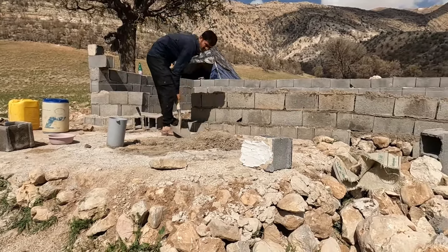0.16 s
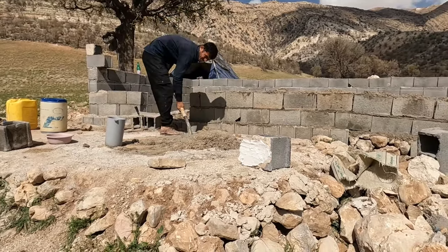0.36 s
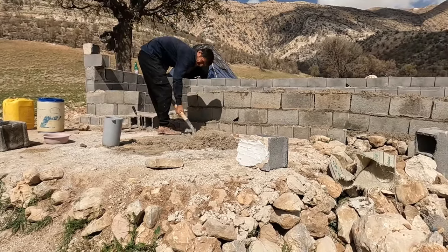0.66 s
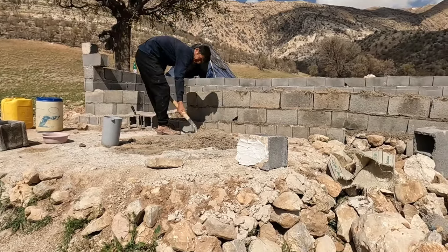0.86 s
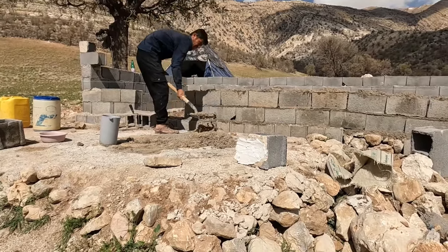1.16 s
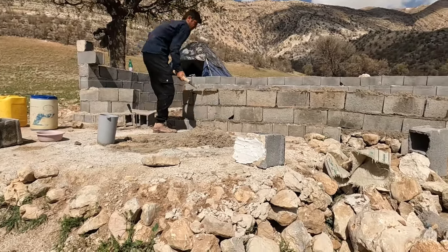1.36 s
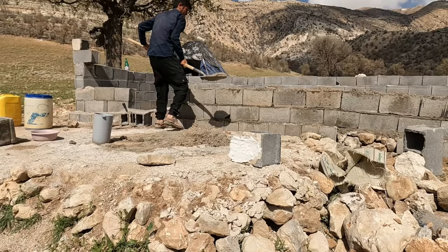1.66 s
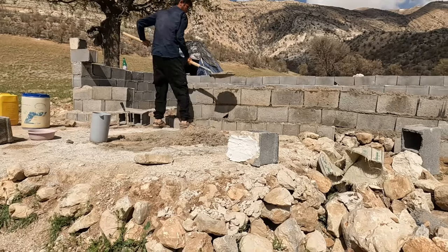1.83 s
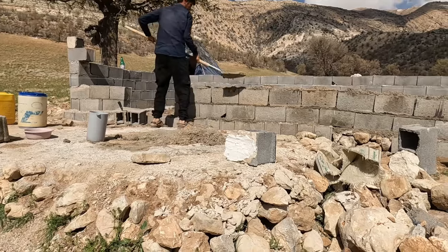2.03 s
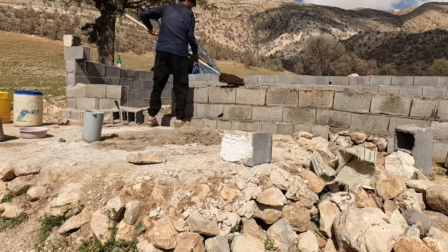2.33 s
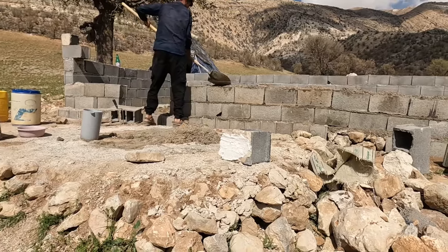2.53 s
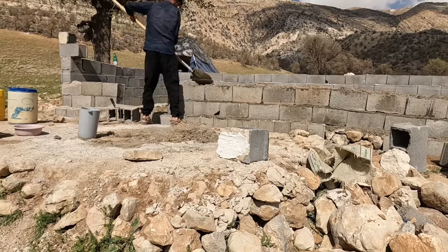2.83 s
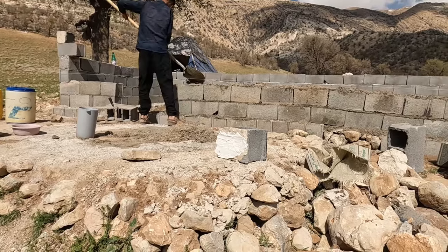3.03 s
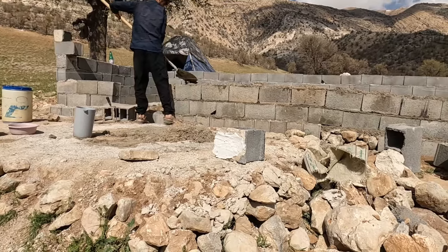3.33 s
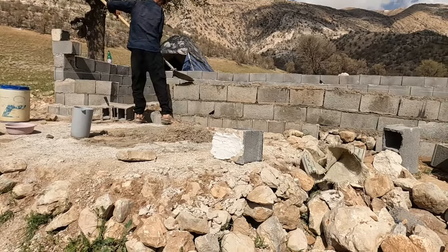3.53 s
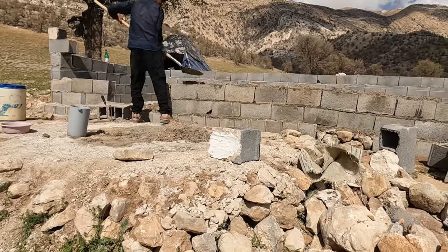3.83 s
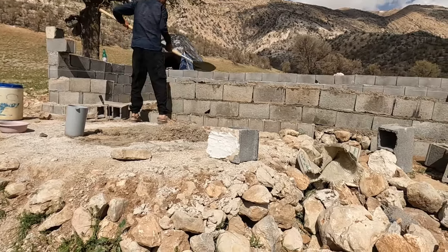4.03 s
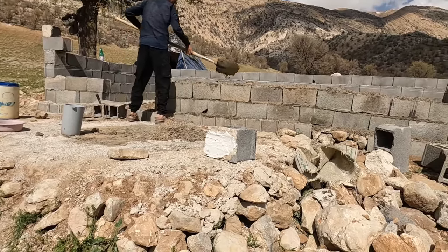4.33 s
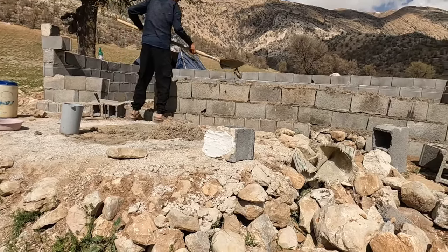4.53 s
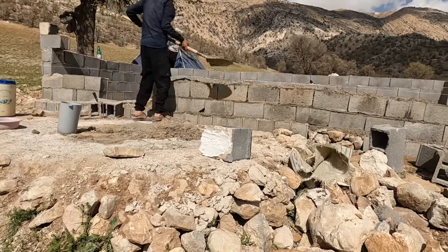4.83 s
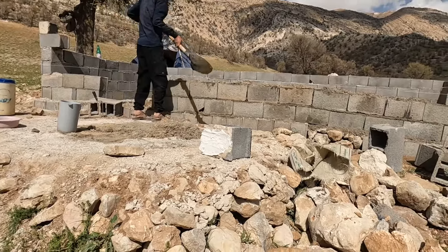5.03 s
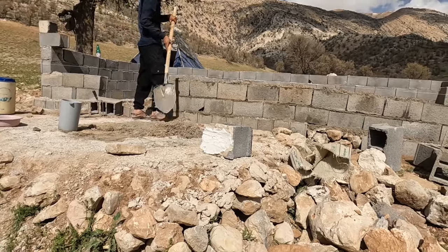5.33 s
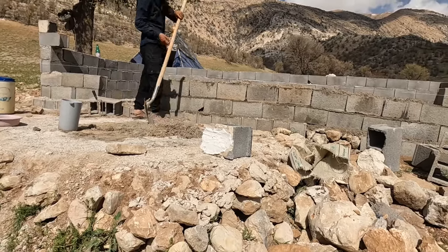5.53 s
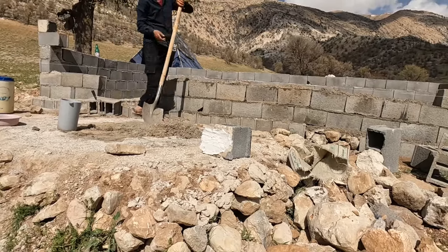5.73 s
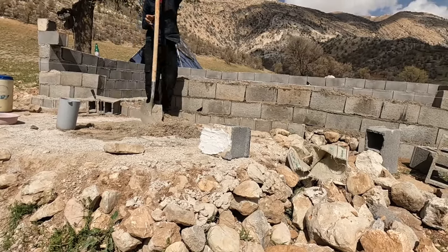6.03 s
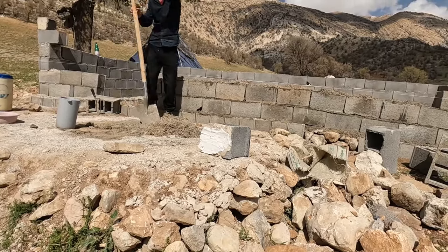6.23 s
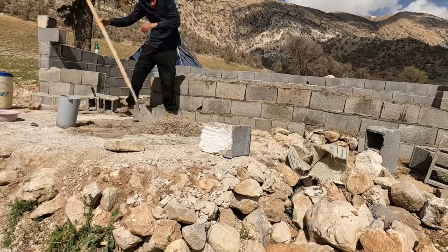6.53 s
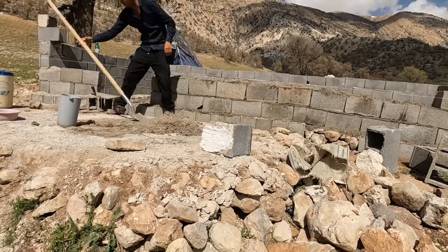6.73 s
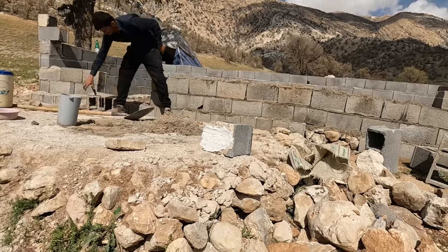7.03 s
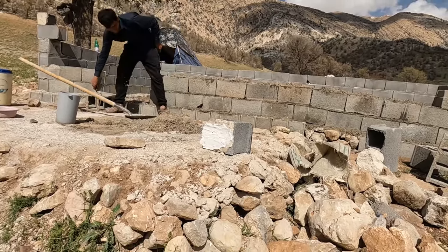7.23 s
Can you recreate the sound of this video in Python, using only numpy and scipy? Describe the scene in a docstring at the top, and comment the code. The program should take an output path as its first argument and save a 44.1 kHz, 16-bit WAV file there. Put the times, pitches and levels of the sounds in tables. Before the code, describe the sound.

Wind rumbles and pops on the microphone as a shovel scoops gritty mortar, tips it out, stabs the heap and is dropped.

```python
"""Some metres off, a steel shovel scrapes up wet mortar, sand hissing and grit ringing the blade,
while gusty wind buffets the microphone ports of a small camera. The load is tipped along a block wall
as the strongest gust hits, near 2.6 s; after it the stereo picture narrows to mono. A faint whistle
rises and thin tones sound far off. Among short slides and ticks of grit, the shovel is stabbed into
the heap at 5.5 s and dropped at 7.2 s with a low, rough thud."""
import sys
import numpy as np
from scipy import signal
from scipy.fft import rfft, irfft, next_fast_len
from scipy.io import wavfile
from scipy.ndimage import uniform_filter1d, map_coordinates

SR = 44100
rng = np.random.default_rng(int(sys.argv[2]) if len(sys.argv) > 2 else 0)


def transcribe(u):
    """Save the signal u as a 16-bit wav file named by the first command-line argument.

    u: samples, shape (n,) or (channels, n), limited to [-1, 1]; the rate is SR.
    q: integer samples, one column per channel.
    """
    v = np.clip(np.atleast_2d(u).T, -1, 1)
    q = np.round(v * 32767).astype(np.int16)
    wavfile.write(sys.argv[1], SR, q)


N = 325899
TIME = np.arange(N) / SR
FFT_SIZE = next_fast_len(N)


def undb(db):
    return 10 ** (np.asarray(db) / 20)


def unit_rms(x):
    return x / np.sqrt(np.mean(x ** 2))


def curves(table):
    """Automation lanes: each column joined by straight lines over the times in the first."""
    times, *columns = np.transpose(table)
    return [np.interp(TIME, times, column) for column in columns]


def band(x, lo_hz, hi_hz, order=2):
    return signal.sosfilt(signal.butter(order, [lo_hz, hi_hz], "bandpass", fs=SR, output="sos"), x)


def spectral_gain(x, gain):
    """Weigh a spectrum by a gain; a complex one also turns the phase."""
    return irfft(rfft(x, FFT_SIZE) * gain, FFT_SIZE)[..., :N]


def equalise(x, points):
    """An EQ curve drawn through (Hz, dB) points."""
    hz, db = np.transpose(points)
    bin_hz = np.maximum(np.arange(FFT_SIZE // 2 + 1) * SR / FFT_SIZE, 1)
    return spectral_gain(x, undb(np.interp(np.log(bin_hz), np.log(hz), db)))


def ring(x, hz, t60):
    """One damped mode; a unit click rings with unit size."""
    pole = np.exp(2j * np.pi * hz / SR - np.log(1000) / (t60 * SR))
    return signal.lfilter([1], [1, -pole], x).imag


def wander(rate_hz):
    """A random modulator: sample and hold, smoothed twice."""
    hold = int(SR / rate_hz)
    steps = np.repeat(rng.standard_normal(N // hold + 1), hold)
    return unit_rms(uniform_filter1d(uniform_filter1d(steps, hold), hold)[:N])


def grains(scatter_db):
    """Dense clicks, a few much larger than the rest."""
    return rng.standard_normal(N) * undb(scatter_db * np.minimum(rng.exponential(size=N), 6.0))


def swell(start, length, first_db, last_db, rise_db_s=609.5, fall_db_s=360.5):
    """Gain that climbs to the start, slides from first_db to last_db and dies away."""
    depth_db, end = 80, start + length
    times = [start - depth_db / rise_db_s, start, end, end + depth_db / fall_db_s]
    return undb(np.interp(TIME, times, [first_db - depth_db, first_db, last_db, last_db - depth_db]))


def place(out, start, sound, peak_db):
    """Lay a sound in at start seconds, scaled to its peak level."""
    i = int(start * SR)
    out[i:i + len(sound)] += (sound * undb(peak_db) / np.abs(sound).max())[:N - i]


# Colour of the ambience bed. Each row: frequency in Hz, relative level in dB.
RUSTLE_EQ = [(300, -13), (550, -21), (800, -12.5), (1300, -2.5), (2000, -8.5), (4000, -16.5), (5200, -4.5),
             (7000, -16), (8000, -33), (10000, -50.5)]
def distant_rustle(level_db=-72.5):
    """A faint bed of far-off rustle whose level flickers."""
    bed = equalise(rng.standard_normal(N), RUSTLE_EQ)
    return unit_rms(bed * undb(1.5 * wander(12))) * undb(level_db)


# Faint tones far off. Each row: start in seconds, length in seconds, pitch in Hz, peak in dB.
FAR_TONES = [(3.542, 0.16, 2350, -67), (3.873, 0.36, 2340, -74.5), (3.966, 0.07, 1320, -66.5),
             (4.05, 0.1, 1000, -66.5), (4.08, 0.087, 5100, -67.5), (4.08, 0.068, 4480, -68),
             (4.17, 0.1, 850, -62), (4.764, 0.065, 5140, -58.5), (5.03, 0.061, 1376, -66)]
def far_tones():
    """Thin, breathy tones: noise through a narrow resonance swells and fades."""
    out, t = np.zeros(N), TIME[:SR // 3]
    for start, length, hz, db in FAR_TONES:
        fade = np.sin(np.pi * np.minimum(t / length, 1)) ** 0.5
        place(out, start, ring(rng.standard_normal(len(t)), hz, t60=0.12) * fade, db)
    return out


# The whistle's glide. Each row: time in seconds, pitch in Hz, level in dB.
WHISTLE_GLIDE = [(3.27, 683, -76), (3.31, 699, -54), (3.42, 760, -57), (3.465, 815, -53),
                 (3.52, 903, -60.5), (3.7, 957, -74)]
def wind_whistle(gate_db=-74):
    """A faint, rough whistle, a narrow band of noise, rises as a gust dies."""
    hz, db = curves(WHISTLE_GLIDE)
    phase = 2 * np.pi * np.cumsum(hz * (1 + 0.032 * wander(30))) / SR
    breath = np.sin(phase) * wander(220) + np.cos(phase) * wander(220)
    return breath * undb(db) * (db > gate_db)


def pop(hz, edge):
    """A pressure dip with a small rebound and a sharper edge on top."""
    u = np.pi * hz * (TIME[:SR // 50] - 0.78 / hz)
    return (2 * u ** 2 - 1) * np.exp(-u ** 2) - edge * 3 * u * np.exp(-5 * u ** 2)


def flapping(pops_per_s=200):
    """A rough, low texture: small pops burst at random and come in clumps."""
    bursts = (rng.random(N) < pops_per_s / SR) * rng.standard_normal(N)
    flaps = unit_rms(signal.fftconvolve(bursts, pop(hz=228, edge=0.38))[:N])
    crackle = unit_rms(band(grains(2.1), 540, 880))
    body = unit_rms(band(rng.standard_normal(N), 170, 363, order=3))
    return unit_rms((flaps + 0.041 * crackle + 0.25 * body) * undb(3.17 * wander(70)))


def buffeting():
    """Bass noise whose level lurches."""
    return unit_rms(band(rng.standard_normal(N), 63.7, 181.8, order=3) * undb(3.33 * wander(25)))


# Sharp wind pops. Each row: start in seconds, peak in dB, pitch in Hz.
WIND_POPS = [(0.666, -30.5, 336), (0.684, -31.5, 352), (0.761, -23, 382), (0.779, -34.5, 397),
             (1.475, -35, 390), (1.538, -35.5, 430), (1.876, -44.5, 426), (2.2, -33, 407),
             (2.252, -34.5, 420), (2.312, -33.5, 330), (2.538, -37, 332), (2.585, -27, 335),
             (2.596, -12.5, 391), (2.606, -18, 347), (2.634, -19.5, 417), (2.68, -18, 487),
             (2.709, -25, 433), (2.727, -21, 385), (2.739, -22, 400), (2.768, -23, 434),
             (2.845, -26.5, 290), (2.862, -25, 440), (2.9, -24, 402), (2.94, -33, 346), (3.076, -36.5, 400),
             (3.457, -41, 394), (3.607, -32, 328), (3.781, -42, 320), (4.087, -49, 330)]
def wind_pops():
    """Single hard eddies burst on the ports, each trailing a ragged wake."""
    out, t = np.zeros(N), TIME[:SR // 30]
    for start, db, hz in WIND_POPS:
        wake = rng.standard_normal(len(t)) * t * np.exp(-t / 0.0047)
        place(out, start, pop(hz, edge=0.68), db)
        place(out, start, band(wake, 1.08 * hz, 2.0 * hz), db - 15)
    return out


def low_wind(rumble_gain, buffet_gain):
    """Large eddies on the ports: a slow, deep rumble under quicker buffeting."""
    rumble = unit_rms(band(rng.standard_normal(N), 26.1, 67.3) * undb(2.0 * wander(9.1)))
    return rumble_gain * rumble + buffet_gain * buffeting()


# The ride of the gusts. Each row: time in seconds, rumble in dB, buffeting in dB over the rumble.
GUSTS = [(0.0, -42, -16), (0.76, -32.5, -6.5), (1.07, -41, -30), (1.19, -37, -3.5), (1.25, -28, -20),
         (1.29, -35.5, -3), (1.42, -33.5, -4.5), (1.58, -28.5, -1.5), (1.77, -36.5, -15.5),
         (1.85, -43.5, 2.5), (1.91, -24.5, -13), (2.04, -48, -3.5), (2.2, -38, -21), (2.3, -32.5, -7),
         (2.34, -24, -24), (2.4, -35.5, -9), (2.51, -33, -14), (2.55, -28, 2), (2.88, -27, -6),
         (3.19, -46.5, 6), (3.38, -31, -3), (3.68, -47, 10), (3.77, -32, -16), (3.89, -53, 10.5),
         (4.14, -32, -19), (4.22, -43, -2), (4.55, -38.5, -13.5), (5.41, -41, -25), (5.47, -38, -17.5),
         (5.62, -31.5, -10), (5.75, -41, -2), (5.95, -39, 1.5), (6.18, -48, 2), (6.33, -40.5, 2),
         (6.48, -36.5, -3.5), (6.54, -51, 4.5), (7.14, -46, -28), (7.18, -53.5, 10), (7.29, -35.5, -13.5),
         (7.34, -35.5, -6), (7.39, -35, -5)]
# Low, rough bursts: wind flurries, then in the last row the thud of the dropped shovel.
# Each row: start in seconds, length in seconds, level in dB.
LOW_BURSTS = [(0.073, 0.014, -59), (0.228, 0.023, -60), (0.414, 0.059, -50), (0.669, 0.019, -42),
              (0.751, 0.015, -38.5), (1.399, 0.028, -39.5), (1.484, 0.039, -35.5), (1.587, 0.015, -37),
              (1.88, 0.026, -45.5), (2.199, 0.018, -34.5), (2.245, 0.015, -32), (2.302, 0.011, -35.5),
              (2.544, 0.046, -37), (2.599, 0.0087, -28), (2.631, 0.014, -32.5), (2.683, 0.013, -31.5),
              (2.722, 0.072, -29), (2.857, 0.02, -28), (2.903, 0.03, -40.5), (3.069, 0.03, -57),
              (3.294, 0.08, -41), (3.436, 0.21, -50.5), (3.78, 0.02, -40), (4.082, 0.011, -52.5),
              (5.793, 0.046, -48.5), (6.157, 0.026, -48.5), (6.316, 0.11, -58), (6.801, 0.013, -61.5),
              (7.194, 0.039, -41.5)]
def wind():
    """Wind on the ports, as mid and side. Fine eddies strike the right port first and harder."""
    rumble_db, buffet_db = curves(GUSTS)
    gust = undb(rumble_db + buffet_db)
    flurry = sum(swell(start, length, db, db) for start, length, db in LOW_BURSTS[:-1])
    buffet_gain = gust + undb(-2) * flurry  # a flurry brings buffeting along
    low_mid = low_wind(undb(rumble_db), buffet_gain)
    low_side = undb(-4.5) * low_wind(undb(rumble_db), buffet_gain)
    fine = (flurry + undb(-36) * gust) * flapping() + wind_pops()
    left = 0.52 * np.exp(-1.55j)  # left port against right: size and lag in radians
    fine_side = spectral_gain(fine, (left - 1) / (left + 1))
    return low_mid + fine + wind_whistle(), low_side + fine_side


# Modes of the bare blade. Each row: frequency in Hz, gain in dB, time to fall 60 dB in seconds.
BLADE_MODES = [(555, 6, 0.08), (616, 0.5, 0.14), (745, -2.5, 0.19), (840, 4, 0.18), (1102, 12, 0.18),
               (1566, 6.5, 0.05), (1954, 11, 0.07), (2340, 8, 0.048), (2980, 8, 0.07), (3186, 2, 0.07),
               (3900, -5, 0.027), (4830, -12, 0.035)]
MORTAR_DAMPING = 1.9  # a loaded blade falls silent this many times sooner
def blade(force, roam_db=0, damping=1):
    """The steel blade rung by a force; as the contact roams, each mode comes and goes."""
    out = np.zeros(len(force))
    for k, (hz, db, t60) in enumerate(BLADE_MODES):
        drive = force * undb(roam_db * wander(14)) if roam_db else force
        out += (-1) ** k * undb(db) * ring(drive, hz, t60 / damping)
    return out


# Ticks of grit, and at 7.177 s the sharp crack of the dropped shovel. Each row: start in seconds, peak in dB,
# centre in Hz, spray decay in seconds.
GRIT_TICKS = [(0.187, -43, 1050, 0.0073), (.278, -41, 1050, 0.012), (1.615, -33, 990, 0.0003),
              (1.626, -41.5, 6000, .004), (1.822, -46.5, 6460, 0.0084), (2.17, -40, 6770, 0.011),
              (3.854, -49, 2900, 0.0053), (4.247, -47, 4320, 0.0039), (4.297, -59, 2310, 0.0033),
              (4.439, -46, 2950, .006), (4.467, -49.5, 1960, .004), (4.526, -40, 2330, 0.0044),
              (4.528, -43, 5000, .004), (4.603, -41, 4840, .004), (4.605, -41, 3180, .005),
              (4.828, -43, 5000, 0.0051), (5.164, -49, 1950, 0.0025), (5.199, -49.5, 2980, 0.0051),
              (6.679, -54, 3080, .004), (7.177, -11, 8900, 0.0011), (7.346, -31.5, 4900, 0.004)]
def grit_ticks():
    """Single grains hit the steel, each a short ping in a spray of noise; the loud tick at 7.177 s is the sharp
    crack of the dropped shovel."""
    out, t = np.zeros(N), TIME[:600]
    for start, db, hz, decay in GRIT_TICKS:
        burst = rng.standard_normal(len(t)) * np.minimum(t / 0.0012, 1) * np.exp(-t / decay)
        spray = band(burst, 0.5 * hz, 2.0 * hz, order=1)
        ping = ring(signal.unit_impulse(len(t), 20), hz, t60=5.6 * decay)
        place(out, start, unit_rms(spray) + 0.78 * unit_rms(ping), db)
    return out


# Short scuffs. Each row: start in seconds, length in seconds, centre in Hz, peak in dB.
GRIT_SCUFFS = [(0.326, 0.064, 1750, -26.5), (0.394, 0.06, 990, -28.5), (0.423, 0.049, 1980, -31.5),
               (0.215, 0.03, 1500, -45), (0.864, 0.11, 1030, -47), (1.916, 0.032, 1500, -37.5),
               (4.388, 0.13, 1920, -49), (4.439, 0.033, 2860, -49), (4.452, 0.04, 1600, -53),
               (4.53, 0.05, 2000, -52), (4.593, 0.016, 3100, -47.5), (4.617, 0.036, 4750, -42),
               (4.696, 0.022, 2510, -57), (4.819, 0.04, 1170, -43), (4.85, 0.06, 1160, -42.5),
               (5.713, 0.038, 1520, -41), (6.046, 0.017, 2860, -50), (6.352, 0.031, 3000, -45),
               (6.381, 0.021, 2620, -39), (6.812, 0.04, 1790, -45.5), (6.869, 0.03, 4560, -47.5)]
def grit_scuffs():
    """Bursts of grit rasp on the steel and lightly ring the damped blade."""
    out, t = np.zeros(N), TIME[:SR // 4]
    grit = grains(1.3) * undb(3.5 * wander(70))
    for start, length, hz, db in GRIT_SCUFFS:
        fade = np.sin(np.pi * np.minimum(t / length, 1)) ** 0.28
        rub = grit[int(start * SR):][:len(t)] * fade
        rasp = band(rub, 0.72 * hz, 1.34 * hz, order=3)
        steel = band(blade(rub, damping=MORTAR_DAMPING), 0.82 * hz, 1.24 * hz)
        place(out, start, unit_rms(rasp) + 0.4 * unit_rms(steel), db)
    return out


# Hits on blade and handle. Each row: start in seconds, crack peak in dB, crack t60 in seconds,
# blade ring and main resonance in dB over the crack, that resonance's pitch in Hz and t60 in seconds.
SHOVEL_HITS = [(0.318, -43.5, 0.053, 13, -27, 503, 0.019), (0.346, -33, 0.027, 0, 9, 1063, 0.076),
               (5.55, -20.5, 0.086, -15.5, -8.5, 485, 0.028), (5.552, -34.5, 0.033, -8, 7.5, 817, 0.055),
               (6.139, -55, 0.27, 7, 10, 470, 0.08), (7.048, -50, 0.09, 2.5, -1, 1900, 0.04),
               (7.171, -20, 0.075, 0, -7, 377, 0.3), (7.178, -26.5, 0.049, -1, 4, 200, 0.09),
               (7.215, -42, 0.08, 5, 4.5, 252, 0.11), (7.344, -47, 0.05, 0, 4.5, 1118, 0.065)]
def shovel_hits():
    """Each blow cracks, rings the blade and sounds a main resonance, from a low thud to a steel clank."""
    out, t = np.zeros(N), TIME[:SR // 4]
    contact = 45 * signal.unit_impulse(len(t))  # the first contact rings every mode
    shove = 25 * signal.unit_impulse(len(t), 60)
    for start, db, t60, ring_db, resonance_db, resonance_hz, resonance_t60 in SHOVEL_HITS:
        envelope = np.minimum(t / 0.004, 1) * np.exp(-np.log(1000) * t / t60)
        crack = rng.standard_normal(len(t)) * envelope
        place(out, start, band(crack, 640, 5400, order=1), db)
        place(out, start, blade(crack + contact), db + ring_db)
        place(out, start, ring(crack + shove, resonance_hz, resonance_t60), db + resonance_db)
    return out


def drop_thud():
    """The low, rough thud of the dropped shovel."""
    start, length, db = LOW_BURSTS[-1]
    return swell(start, length, db, db) * (flapping() + undb(-2) * buffeting())


def mortar_friction():
    """Sand hisses along the steel; coarser grit crunches, grinds and rings the blade."""
    slip = wander(45)  # stick and slip moves all grain sizes together
    hiss = unit_rms(band(grains(3.2), 3640, 10330) * undb(0.7 * slip + wander(30)))
    steel = blade(grains(4.44) * undb(0.99 * slip), roam_db=4.0, damping=MORTAR_DAMPING)
    playhead = np.arange(N) + np.cumsum(0.022 * wander(7))  # the load bends the pitch
    steel = map_coordinates(steel, [playhead], mode="mirror")
    crunch = unit_rms(band(grains(3.8), 1300, 4600) * undb(2.1 * slip + wander(37)))
    grind = unit_rms(band(grains(2.0), 350, 1610) * undb(0.33 * slip + wander(30)))
    grind += 0.51 * unit_rms(band(steel, 420, 1300))
    return hiss, crunch, grind, unit_rms(band(steel, 1400, 3900))


# Two long gestures: scooping the heap, then tipping along the wall.
# Each row: time in seconds, sand hiss in dB, then crunch and grind in dB over the hiss.
SCOOP_AND_TIP = [
    [(.1, -69.5, 0, 1), (.29, -60.5, 0, 5.5), (.325, -27, -13.5, -22), (.352, -32, 1.5, -16),
     (.375, -35, -11, -3), (.42, -33.5, -3, -13), (.5, -42.5, -9, -7), (.6, -44, -10, 0),
     (.72, -50.5, -2, 2), (.9, -51.5, -4.5, 0.5), (1.0, -65.5, -6, -2.5), (1.11, -54.5, -30, -11.5),
     (1.2, -52.5, -17, -7.5), (1.68, -63.5, -4.5, -18), (1.8, -69, -20, -17)],
    [(2.15, -80, -23, -27), (2.184, -46, -33, -34), (2.216, -57.5, -6, -7), (2.3, -46, -9, -29),
     (2.444, -45, -11.5, -35), (2.47, -41, -8.5, -23), (2.96, -57, 0.5, -8), (3.16, -51.5, -0.5, -26.5),
     (3.3, -59, 5.5, -1.5), (3.55, -70, 4.5, 8), (3.75, -80.5, 3, -4)],
]
# Short slides of the blade. Each row: start and length in seconds, hiss in dB at start and end,
# then crunch, grind and blade ring in dB over the hiss.
SLIDES = [(1.873, 0.058, -60.5, -56, 6.5, 3, 4.5), (1.992, 0.059, -99, -82, -10, -1, 8),
          (4.378, 0.036, -62.5, -59, -11, -16, -5.5), (4.447, 0.19, -58, -60.5, -5.5, -21.5, -6.5),
          (4.672, 0.12, -61, -63.5, -16, -17.5, -17.5), (4.832, 0.091, -65, -72.5, 0.5, 4, 3.5),
          (5.156, 0.57, -71, -62, -7.5, -33.5, -7), (5.558, 0.053, -48, -45.5, -5, -0.5, -3.5),
          (5.645, 0.25, -58.5, -66, 5.5, 2.5, -2), (5.967, 0.21, -67, -77.5, 0.5, 4, 4.5),
          (6.164, 0.036, -68.5, -72, 9.5, 16.5, 9), (6.225, 0.2, -73, -64.5, 8.5, 3.5, 6),
          (6.487, 0.2, -65, -67, 5.5, 5, 9), (6.728, 0.21, -66.5, -63, 1, -7, 3.5),
          (6.975, 0.29, -66.5, -73, -3, -19, -8), (7.055, 0.024, -56, -60.5, -0.5, -12, 5),
          (7.185, 0.068, -46, -59, -1, 6, 3.5), (7.274, 0.037, -60.5, -73, -5.5, 1, 4.5),
          (7.333, 0.065, -56.5, -55.5, 0, -4.5, 1)]
def shovel_scrapes():
    """Steel slides against wet mortar; each gesture plays its own blend of the friction textures."""
    hiss, crunch, grind, steel = mortar_friction()
    gestures = np.concatenate(SCOOP_AND_TIP)
    hiss_db, crunch_db, grind_db = curves(gestures)
    loaded_crunch = crunch + undb(-8) * steel  # a loaded blade rings little
    blend = hiss + undb(crunch_db) * loaded_crunch + undb(grind_db) * grind
    out = undb(hiss_db) * blend * (TIME < gestures[-1, 0])
    for start, length, first_db, last_db, crunch_db, grind_db, ring_db in SLIDES:
        blend = hiss + undb(crunch_db) * crunch + undb(grind_db) * grind + undb(ring_db) * steel
        out += swell(start, length, first_db, last_db, rise_db_s=814, fall_db_s=306) * blend
    return out


def wall_scatter(shovel):
    """Side signal: wall and ground scatter a little of the shovel, most of all its treble."""
    reflections = unit_rms(rng.standard_normal(400)) / 20
    scatter = signal.fftconvolve(shovel, reflections)[:N]
    left_lean = undb(-12.5) * band(shovel, 6800, 10500)
    return undb(-11.5) * scatter + undb(-2) * band(scatter, 9500, 15000) + left_lean


# The stereo picture closing to mono. Each row: time in seconds, side gain in dB.
STEREO_WIDTH = [(0, -0.5), (2.95, -0.5), (3.15, -8.5), (3.6, -15.5), (3.85, -66)]
def scene():
    """Ambience, wind and shovel, mixed as mid and side and returned as left and right."""
    width = undb(curves(STEREO_WIDTH)[0])
    wind_mid, wind_side = wind()
    shovel = shovel_scrapes() + shovel_hits() + grit_scuffs() + grit_ticks()
    shovel += width * band(shovel, 5640, 10600)  # brighter while the picture is wide
    shovel_side = wall_scatter(shovel)
    mid = wind_mid + shovel + distant_rustle() + far_tones()
    side = (wind_side + shovel_side + undb(0.5) * distant_rustle()) * width
    return np.array([mid + side, mid - side]) + drop_thud()


# Tone of the microphone ports. Each row: frequency in Hz, gain in dB.
MIC_EQ = [(20, 6.5), (4500, -7.5), (7300, -9), (7800, -15.5), (8600, -28), (11000, -23.5), (11800, -19.5),
          (13000, -23.5), (14800, -32.5)]
def record(dry):
    """The ports favour the lows and fall away steeply above 7 kHz; the top is cut at 15 kHz."""
    high_cut = signal.ellip(8, 0.2, 70, 15000, fs=SR, output="sos")
    return signal.sosfilt(high_cut, equalise(dry, MIC_EQ))


dry = scene()
out = record(dry)
transcribe(out)
```